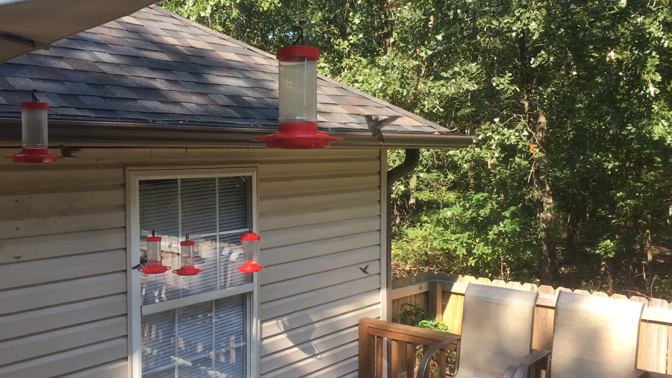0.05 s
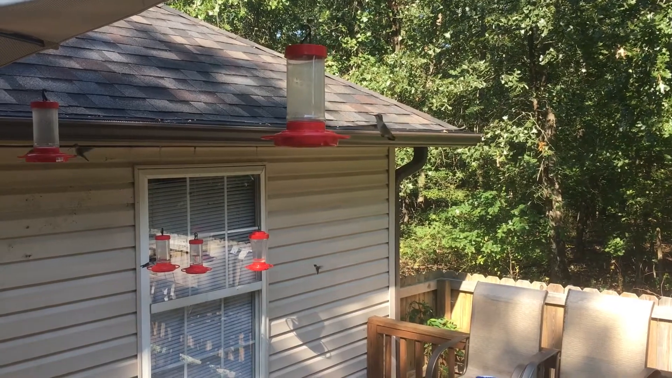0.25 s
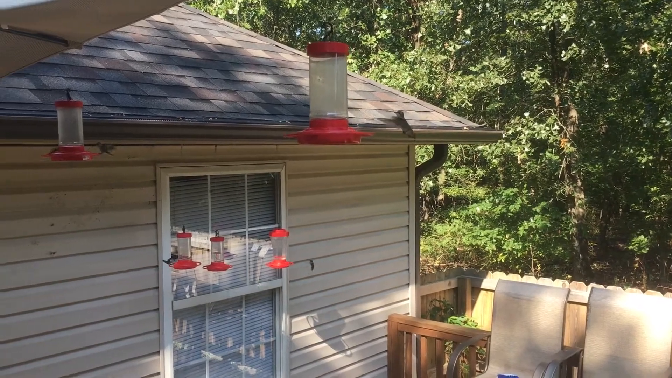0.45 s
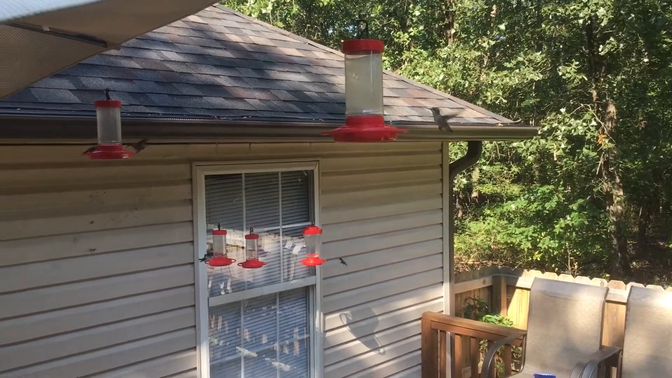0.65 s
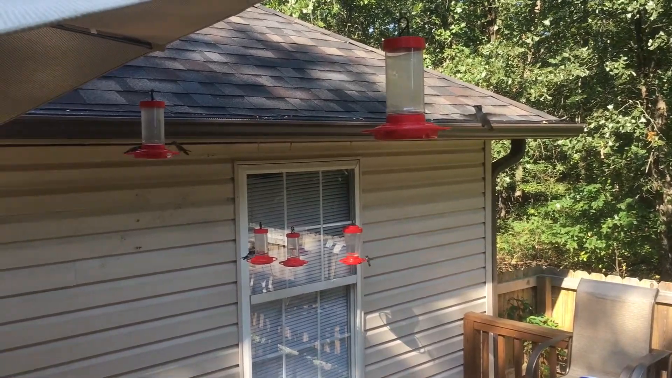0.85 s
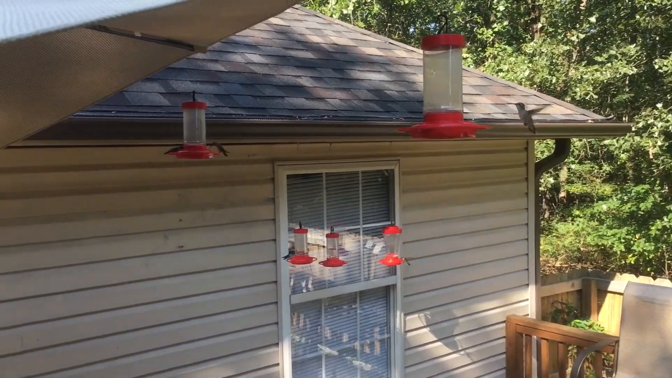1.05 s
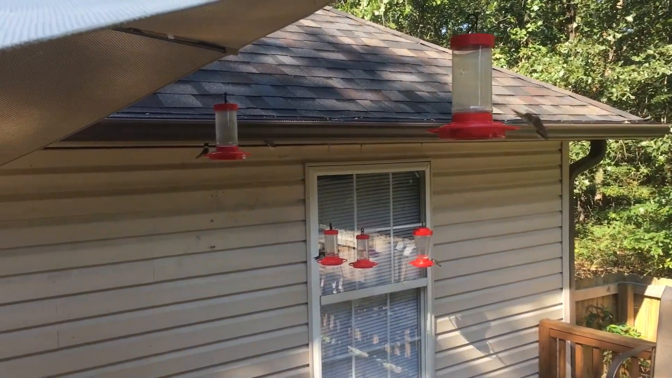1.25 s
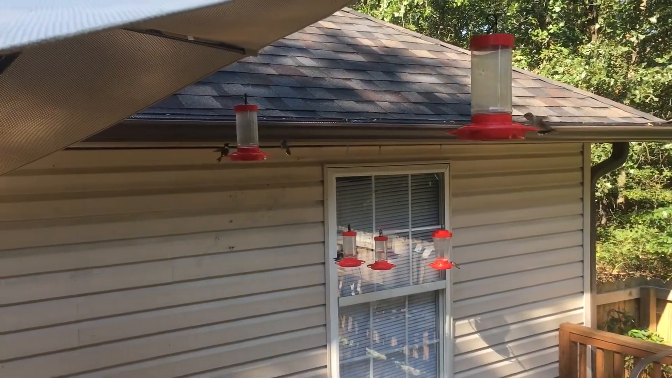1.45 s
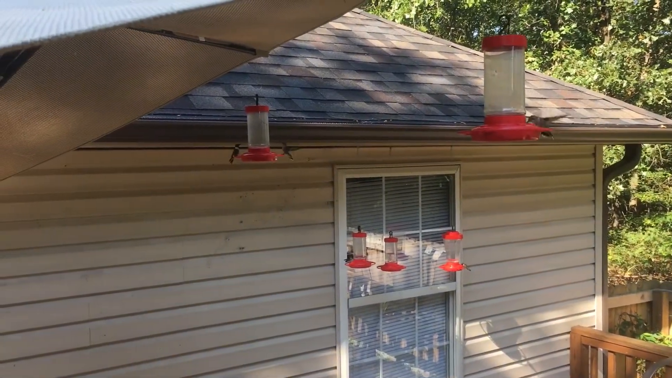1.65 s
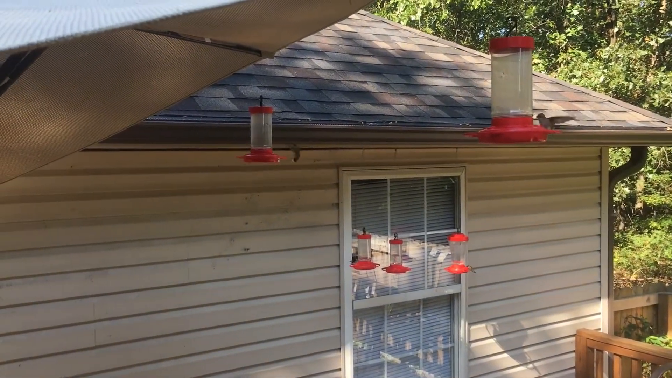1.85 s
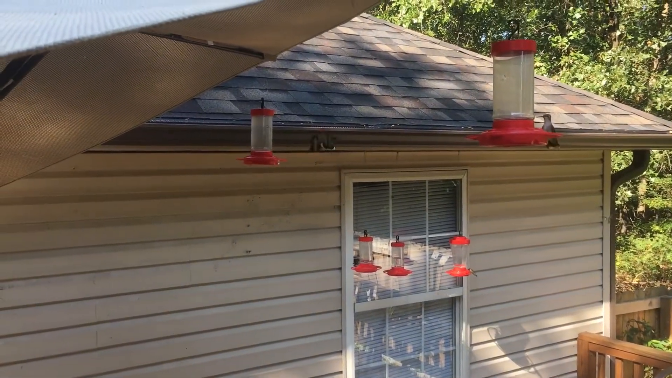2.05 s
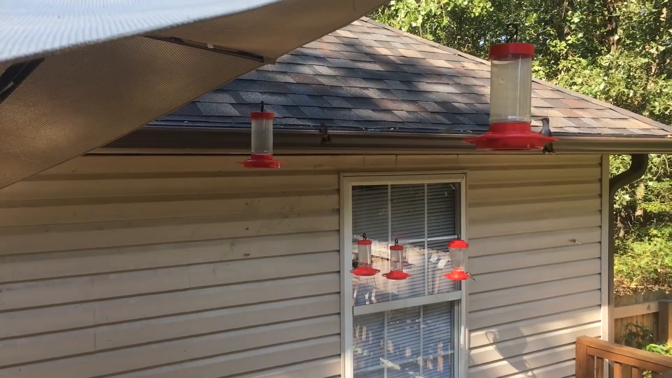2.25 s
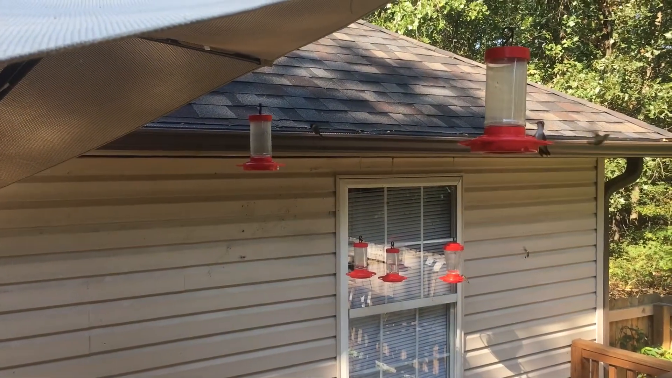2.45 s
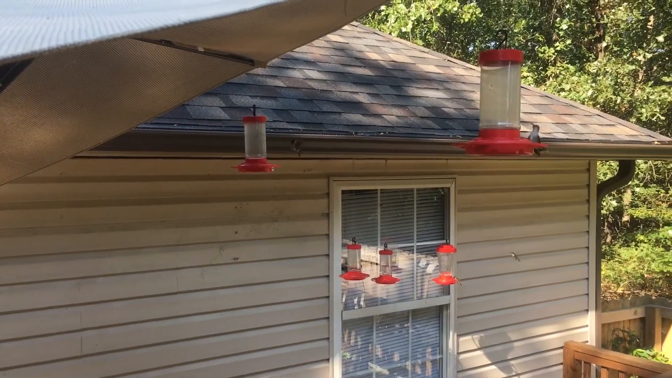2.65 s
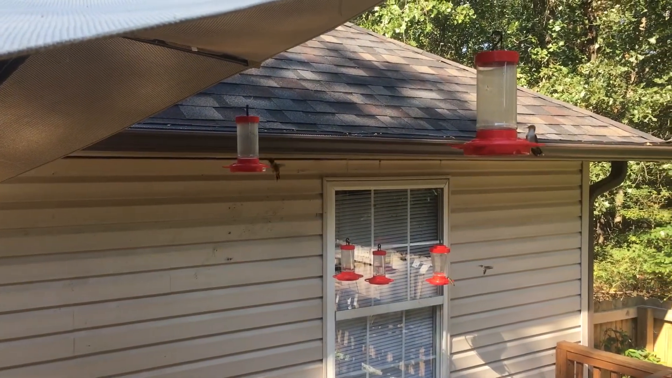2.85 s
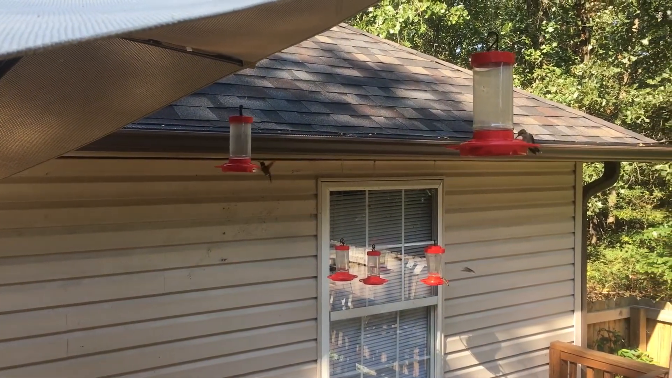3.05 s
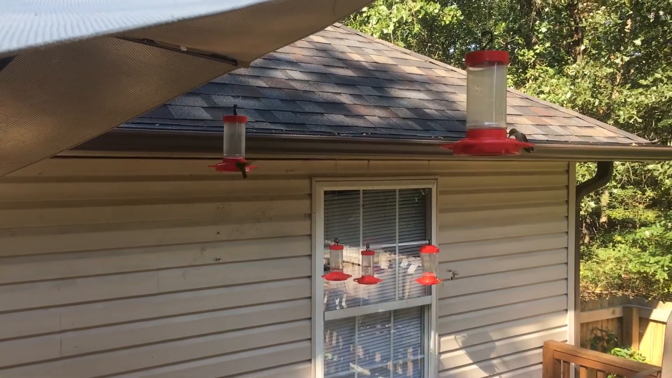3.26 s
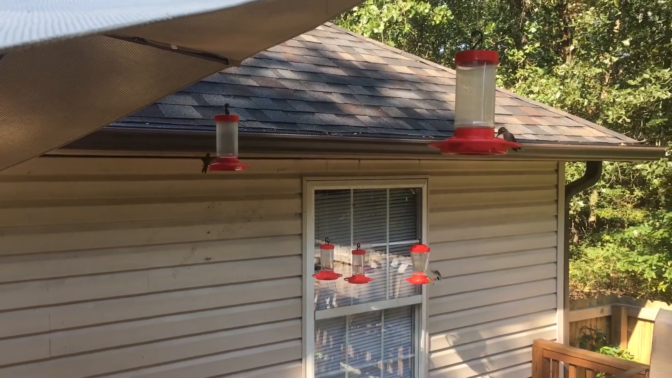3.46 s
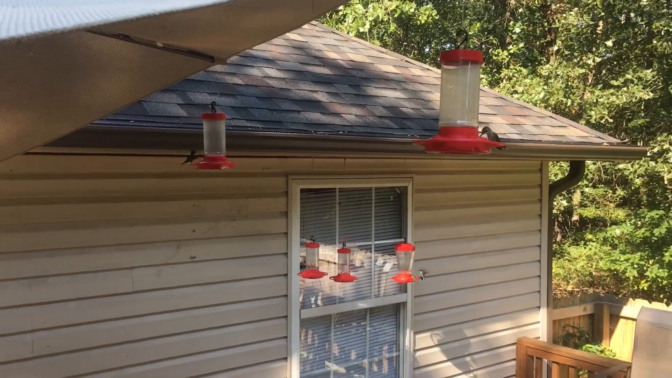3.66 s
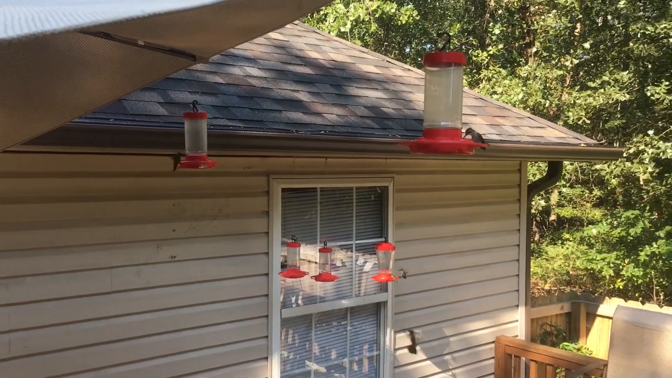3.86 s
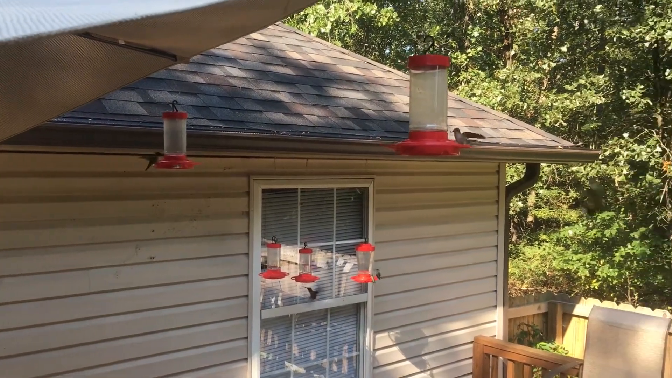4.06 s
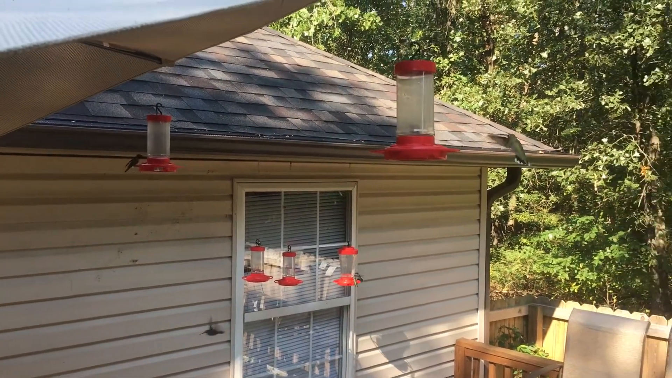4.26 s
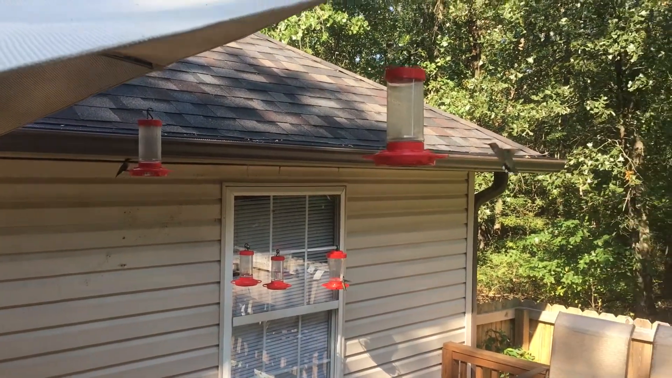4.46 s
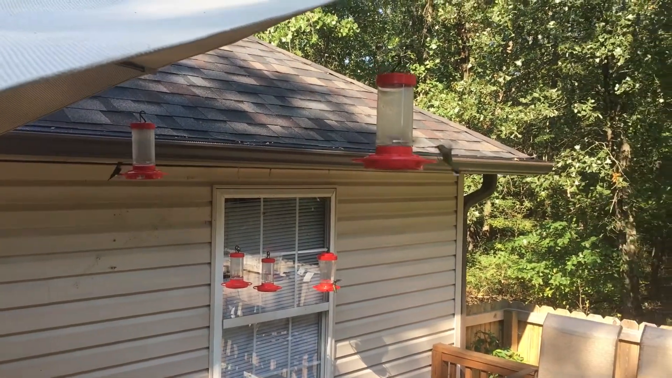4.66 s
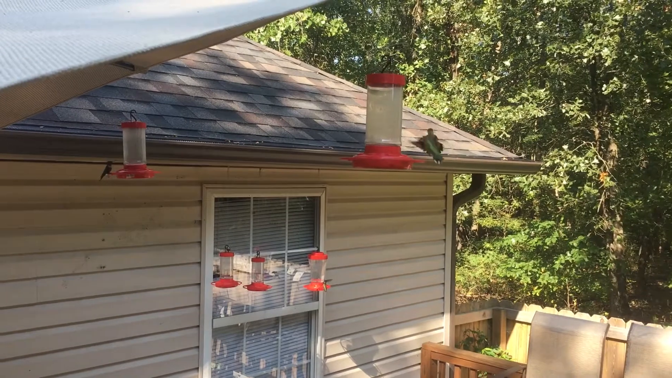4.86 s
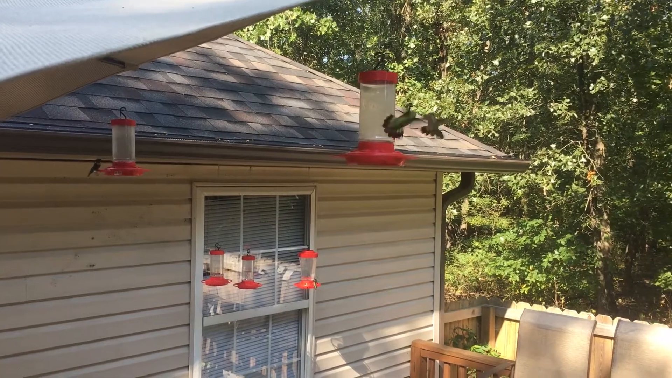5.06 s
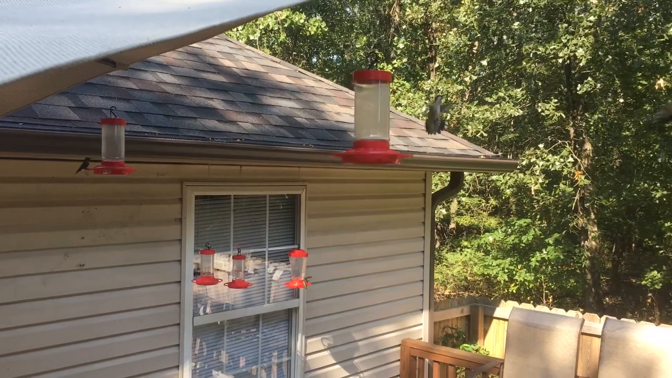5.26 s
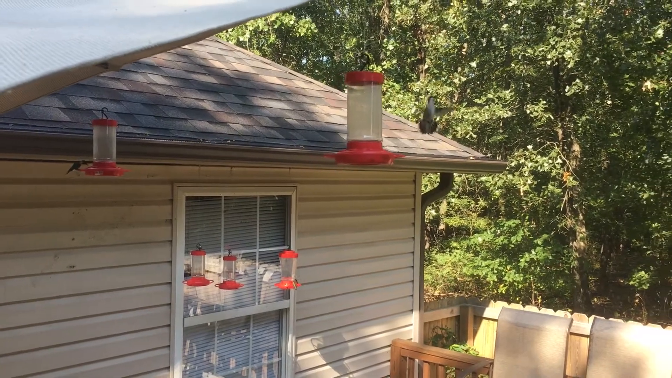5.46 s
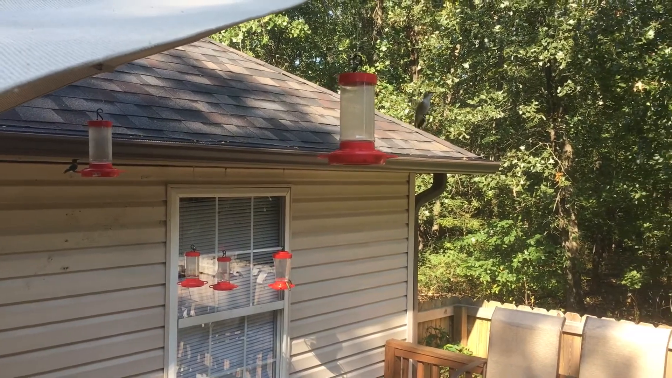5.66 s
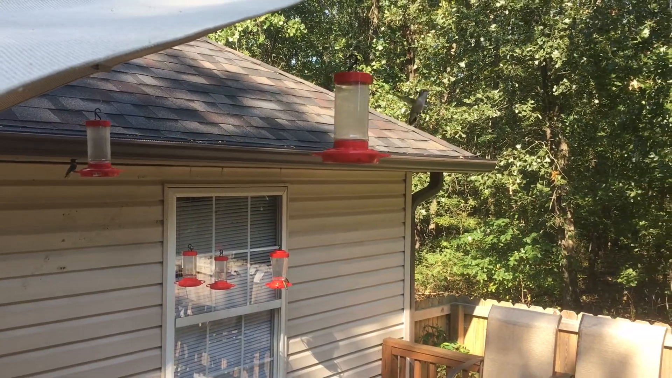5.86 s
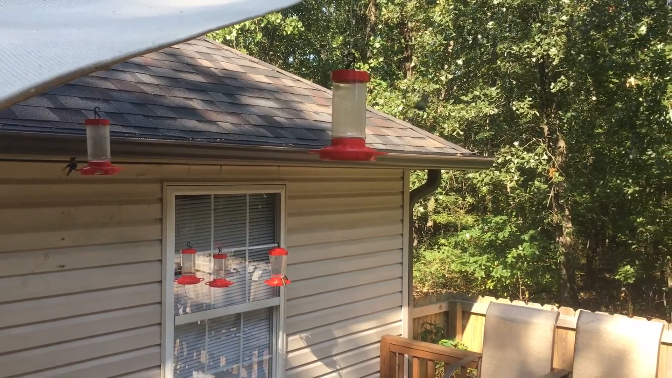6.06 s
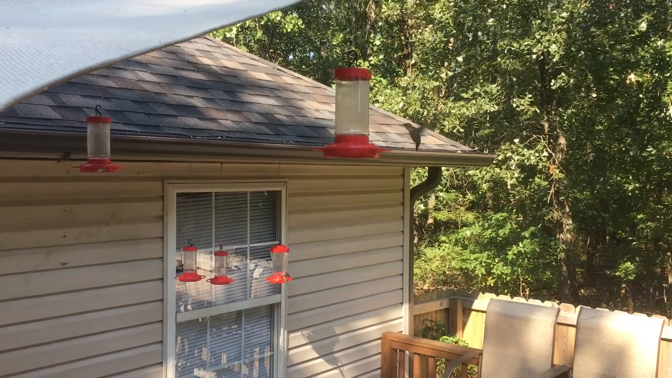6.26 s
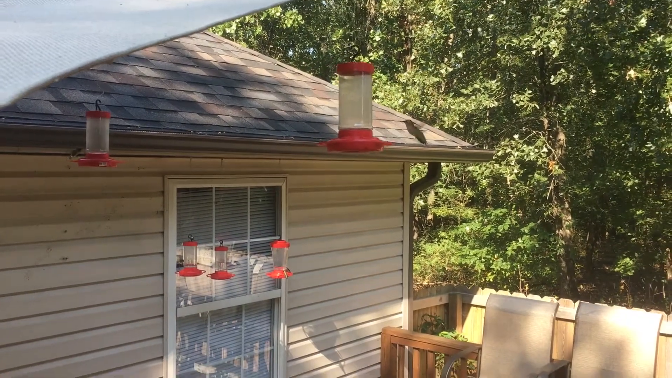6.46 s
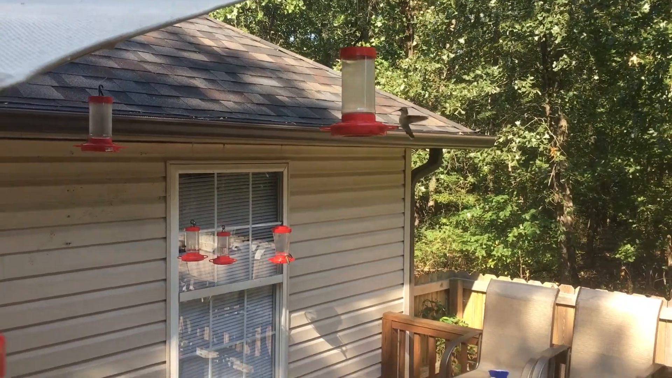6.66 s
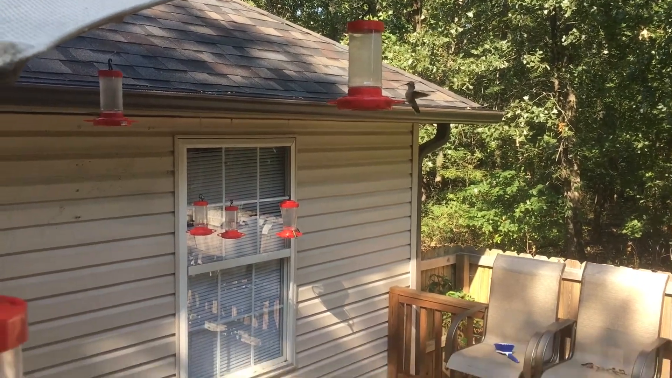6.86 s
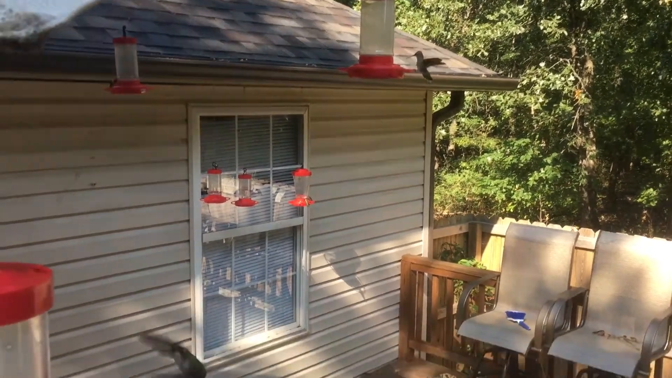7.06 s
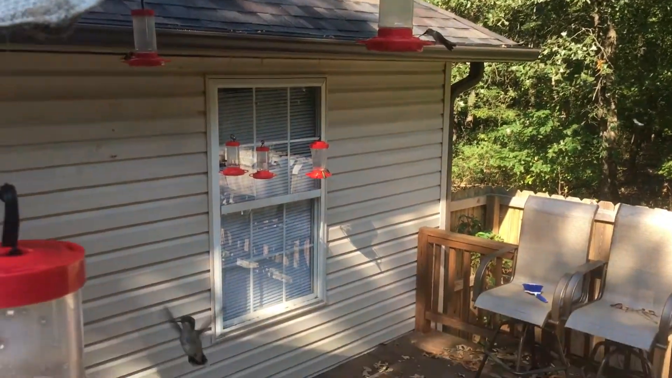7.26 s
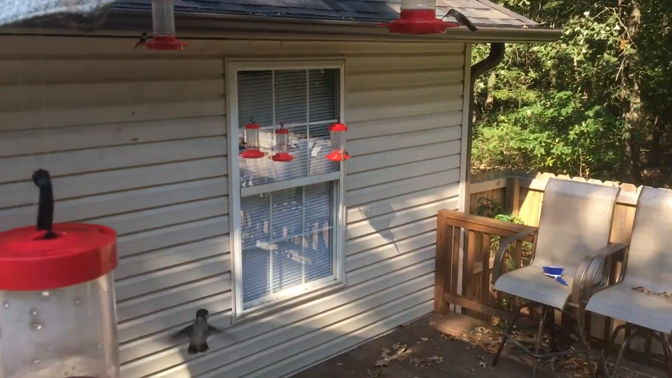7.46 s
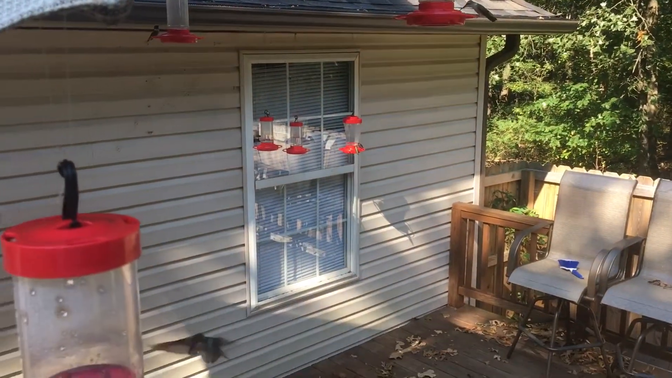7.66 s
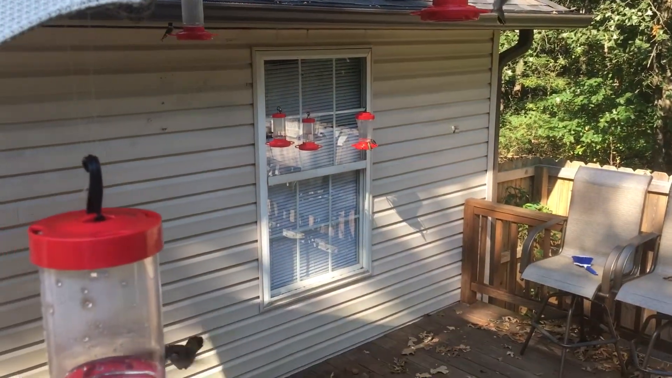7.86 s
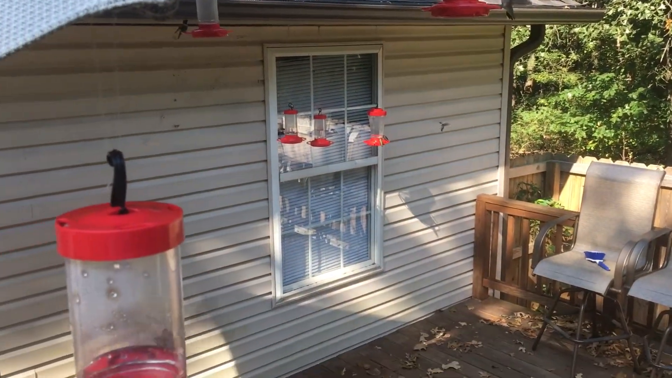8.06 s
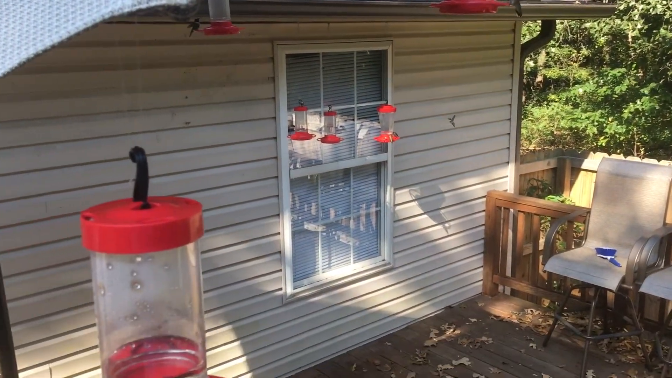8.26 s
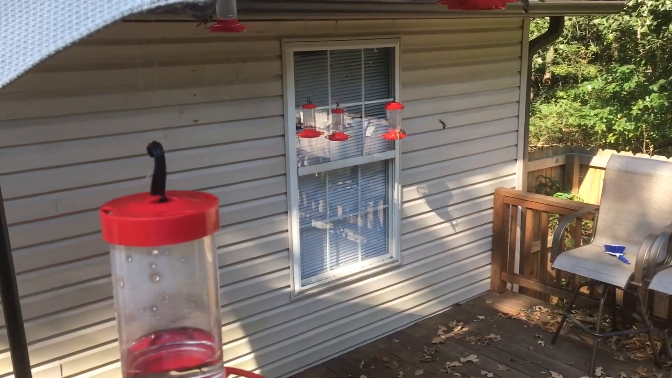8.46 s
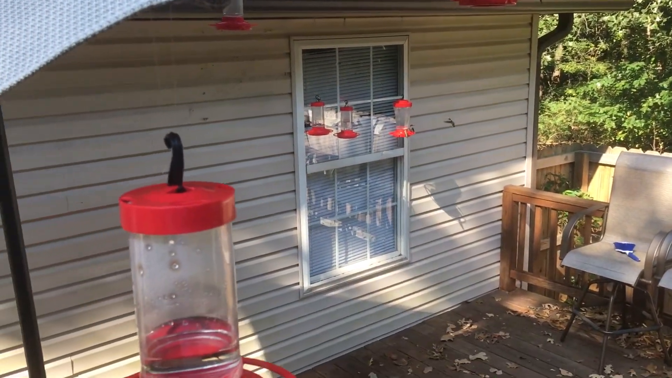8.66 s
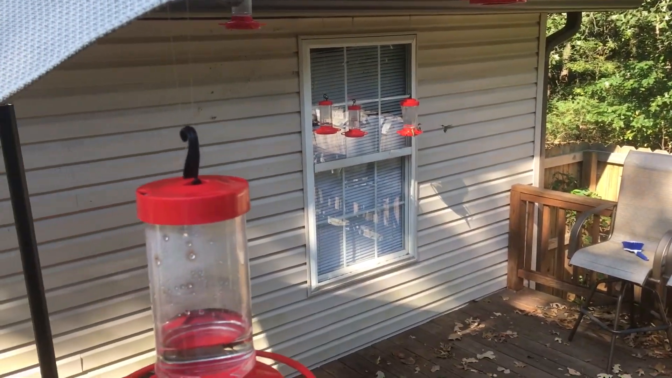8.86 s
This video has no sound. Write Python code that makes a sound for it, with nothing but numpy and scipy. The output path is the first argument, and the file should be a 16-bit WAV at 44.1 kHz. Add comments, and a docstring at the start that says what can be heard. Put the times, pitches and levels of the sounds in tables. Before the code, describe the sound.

A handheld microphone near feeders catches small birds at mixed distances. High squeals and dry rasps open over pulsing insect hiss and low outdoor rumble. Just past the middle, a loud piercing squeal leads into close buzzy chips. A deep wing flutter then brushes by and another bird hovers, before softer chip runs and squeals end the scene. A faint engine hum sinks and fades; reflections off the siding are short.

```python
"""Yard beside a house wall, with feeders: hummingbirds squabble, some close, most farther off.
Chips, rasps, buzzes and squeaks are gliding harmonic stacks through bill resonances; squeals are wavering two-partial tones.
Wings whirr past as summed wingbeat harmonics with swish and feather noise, once very near; one bird hovers.
Insects shrill in the trees as pulsed narrow-band noise over a far chorus, a rumble and a faint animal cry.
A far engine, likely a small plane, drones away, sinking and fading."""
import sys
import numpy as np
from scipy import signal
from scipy.fft import rfft, irfft
from scipy.io import wavfile
from scipy.ndimage import uniform_filter1d

SR = 44100
rng = np.random.default_rng(int(sys.argv[2]) if len(sys.argv) > 2 else 0)


def log_audio(samples):
    """Write samples as a 16-bit WAV file to the path given in sys.argv[1]."""
    # one column per channel
    frames = np.atleast_2d(samples).T
    # limit to full scale, then quantise
    limited = np.clip(frames, -1, 1)
    pcm = np.round(limited * 32767).astype(np.int16)
    wavfile.write(sys.argv[1], SR, pcm)


N = 392490

# resonances of throat and open bill: freq_hz, gain_db
BILL_RESONANCES = [(1400, 2), (2200, -1), (3200, -4.5), (4300, -3.5), (6200, 1), (8200, 4), (10200, -4),
                   (12500, -6.5), (15500, -16)]
CUTOFF_HZ = 15800


def from_db(db):
    """Amplitude ratio of a level in dB."""
    return 10 ** (np.asarray(db) / 20)


def rms_one(x):
    """Scale to rms 1."""
    return x / np.sqrt(np.mean(x ** 2) + 1e-20)


def at_hz(points, hz):
    """Gain of a spectrum, interpolated in dB over log frequency."""
    point_hz, point_db = np.transpose(points)
    return from_db(np.interp(np.log(hz), np.log(point_hz), point_db))


def add(out, start_s, sound):
    """Mix a sound in, cut at the end of the scene."""
    i = max(round(start_s * SR), 0)
    out[i:i + len(sound)] += sound[:max(N - i, 0)]


def drift(rate_hz):
    """Slow random curve, rms 1: noise through a double pole, run at SR / 40."""
    pole = np.exp(-80 * np.pi * rate_hz / SR)
    white = rng.standard_normal(N // 40 + 2002)
    slow = signal.lfilter([1], [1, -2 * pole, pole * pole], white)[2000:]   # drop the settling
    return np.interp(np.arange(N) / 40, np.arange(len(slow)), rms_one(slow))


def noise(spectrum):
    """Noise of a given spectrum, rolled off below its first point, rms 1."""
    hz = np.maximum(np.arange(N // 2 + 1) * SR / N, 1)
    low_cut = hz ** 2 / (hz ** 2 + spectrum[0][0] ** 2)
    white = rfft(rng.standard_normal(N))
    return rms_one(irfft(white * at_hz(spectrum, hz) * low_cut, N))


def narrow_noise(hz, width_hz):
    """Noise in one resonance, rms 1."""
    sos = signal.butter(2, [hz - width_hz / 2, hz + width_hz / 2], "band", fs=SR, output="sos")
    return rms_one(signal.sosfilt(sos, rng.standard_normal(N)))


def turns(hz):
    """Phase in radians of a moving pitch."""
    return 2 * np.pi * np.cumsum(hz) / SR


def wobble(n, count):
    """Random bends across one call: count points joined by lines."""
    return np.interp(np.linspace(0, count - 1, n), np.arange(count), rng.standard_normal(count))


def swell(u, attack, fullness):
    """Loudness arch over one note; attack below 1 moves its peak early."""
    return np.abs(np.sin(np.pi * u ** attack)) ** fullness


def sweep(length_s, start_hz, end_hz, trill, dull=0, trill_hz=205, bend=1.35, jitter=0.017,
          attack=0.6, fullness=0.83, order=9):
    """One syrinx note: a harmonic stack glides through the bill's resonances; a fast trill makes it a buzz."""
    u = np.linspace(0, 1, max(round(length_s * SR), 8))
    glide_hz = start_hz + (end_hz - start_hz) * u ** bend
    trill_curve = trill * np.cos(2 * np.pi * trill_hz * length_s * u)
    pitch_hz = glide_hz * np.exp(trill_curve + jitter * wobble(len(u), count=14))
    k = np.arange(1, order + 1)[:, None]
    gain = at_hz(BILL_RESONANCES, k * pitch_hz) * (k * pitch_hz < CUTOFF_HZ) / k ** dull
    stack = gain * np.cos(k * turns(pitch_hz))
    return rms_one(stack.sum(0)) * swell(u, attack, fullness)


def distance_of(db, near_db=-36, near_m=1.18, db_per_doubling=8):
    """All birds call about equally hard, so a call's level tells its distance in m."""
    return near_m * 2 ** ((near_db - db) / db_per_doubling)


def yard_echo(x, t60_s=0.34, build_s=0.00075, early_db=5, early_s=0.0076):
    """A quick cluster of reflections off siding and deck, then a short, diffuse tail from the trees."""
    t = np.arange(SR // 2) / SR
    decay = from_db(-60 * t / t60_s) + from_db(early_db) * np.exp(-t / early_s)
    tail = rng.standard_normal(len(t)) * decay * (1 - np.exp(-t / build_s))
    low_pass = signal.butter(1, 11000, fs=SR, output="sos")
    tail = signal.sosfilt(low_pass, tail / np.linalg.norm(tail))
    return signal.fftconvolve(x, tail)[:N]


def in_yard(notes, echo_distance_m=4.2):
    """Place notes (start_s, sound, distance_m): near ones sound dry, far ones mostly by their echo."""
    direct, sent = np.zeros((2, N))
    for start_s, sound, distance_m in notes:
        wet = distance_m / echo_distance_m   # 1: echo as loud as direct sound
        add(direct, start_s, sound / np.hypot(1, wet))
        add(sent, start_s, sound * wet / np.hypot(1, wet))
    return direct + yard_echo(sent)


def background(air_level_db=-55.5, flicker_db=1.07):
    """Low outdoor rumble under the hiss of many far insects; a low and a high choir fade at their own pace."""
    # steady outdoor air: freq_hz, density_db_per_hz (relative)
    air_spectrum = [(25, -25), (48, 4.5), (100, -1), (200, -5), (350, -13), (600, -23), (1200, -30.5),
                    (2000, -28.5), (10400, -37.5), (11500, -34.5), (15500, -37)]
    # blended far insects: freq_hz, density_db_per_hz (relative)
    chorus_spectrum = [(1600, -20), (2250, 0), (3250, 0), (3800, -9), (5300, -10), (6100, 0), (6600, -5),
                       (7600, -2), (9000, -5), (9550, -8), (10100, -28)]
    # choirs: low_hz, high_hz, level_db (at 0 s, before band-pass), fade_db_per_s
    choir_bands = [(1020, 4130, -58.5, 0.61), (4570, 15200, -61, 0.14)]
    t = np.arange(N) / SR
    out = from_db(air_level_db) * noise(air_spectrum)
    for low_hz, high_hz, db, fade_db_per_s in choir_bands:
        band = signal.butter(4, [low_hz, high_hz], "band", fs=SR, output="sos")
        choir = signal.sosfilt(band, noise(chorus_spectrum))
        out = out + from_db(db - fade_db_per_s * t + flicker_db * drift(9.0)) * choir
    return out


def engine(start_hz=170.15, sag_hz_per_s=1.36, level_db=-50, recedes_s=4, fade_db_per_s=3,
           waver_db=1.24, waver_hz=0.27, octave_db=-18.5, octave_waver_db=2.5):
    """A drone with a weak octave that sinks in pitch and fades as it recedes."""
    t = np.arange(N) / SR
    db = level_db - fade_db_per_s * np.maximum(t - recedes_s, 0)
    phase = turns(start_hz - sag_hz_per_s * t + waver_hz * drift(1.7))
    octave = from_db(octave_db + octave_waver_db * drift(5.2)) * np.sin(2 * phase)
    return np.sqrt(2) * from_db(db + waver_db * drift(4.3)) * (np.sin(phase) + octave)


def far_call(distance_m=7):
    """A faint, falling animal cry from the woods, in two parts: wavering sines."""
    # start_s, length_s, start_hz, end_hz, level_db (peak)
    cries = [(6.56, .1, 1025, 995, -69.5), (6.68, .24, 985, 880, -70)]
    notes = []
    for start_s, length_s, start_hz, end_hz, db in cries:
        u = np.linspace(0, 1, round(length_s * SR))
        glide_hz = start_hz + (end_hz - start_hz) * u ** 2
        phase = turns(glide_hz * (1 + 0.0035 * wobble(len(u), count=10)))
        cry = from_db(db) * np.sin(phase) * swell(u, attack=0.46, fullness=0.52)
        notes.append((start_s, cry, distance_m))
    return in_yard(notes)


def insects(depth=0.22, lisp_per_s=3.9, lisp_db=-67, answer_db=-70):
    """Wing files scraped in fast pulses on narrow resonances; two more lisp by turns in slow, higher bursts."""
    # trills: start_s, stop_s, freq_hz, width_hz, pulses_per_s, level_db (before pulsing)
    trills = [(0, 1.25, 8570, 60, 29, -67), (2.33, 4.4, 8490, 60, 29, -68), (4.4, 7.02, 8550, 60, 29, -69),
              (0, 8.9, 7750, 60, 27, -70.5), (1.2, 8.9, 8200, 60, 28, -74)]
    t, out = np.arange(N) / SR, 0
    for start_s, stop_s, hz, width_hz, per_s, db in trills:
        singing = uniform_filter1d(1. * ((t >= start_s) & (t < stop_s)), size=1500)   # soft edges
        pulses = 1 + depth * np.sin(turns(per_s * (1 + 0.024 * drift(1.4))))
        out = out + from_db(db) * singing * pulses * narrow_noise(hz, width_hz)
    turn = turns(lisp_per_s * (1 + 0.23 * drift(1.84))) / 2   # half phase: one burst each per cycle
    lisp = from_db(lisp_db) * np.sin(turn) ** 4 * narrow_noise(9320, width_hz=590)
    answer = from_db(answer_db) * np.cos(turn) ** 4 * narrow_noise(8670, width_hz=250)
    return out + lisp + answer


def far_twitter(distance_m=10, count=26):
    """Other birds keep up faint chips at random around the yard; louder ones are trilled more."""
    notes = []
    for when, loud, high in rng.random((count, 3)):
        chip = sweep(.022, 2400 + 2000 * high, 1780, trill=0.11 * loud)
        notes.append((when * N / SR, from_db(-62 + 8 * loud) * chip, distance_m))
    return in_yard(notes)


def hover(from_s=6.2, until_s=8.06, fade_db_per_s=34, beats_per_s=43, level_db=-58,
          unsteady=0.04, flutter_db=3):
    """Close hovering: both strokes of a beat push air, so the hum is strongest at twice the beat rate."""
    t = np.arange(N) / SR
    db = level_db - fade_db_per_s * np.abs(t - np.clip(t, from_s, until_s))
    phase = turns(beats_per_s * (1 + unsteady * drift(6.41)))
    harmonics_db = [-6, 0, -13, -9]
    hum = sum(from_db(level) * np.sin(k * phase) for k, level in enumerate(harmonics_db, 1))
    return from_db(db + flutter_db * drift(6)) * rms_one(hum)


def wings(beats_per_s=49, leaving_ratio=1.55, doppler=.04, swish_db=-7, feather_db=-19.5,
          feather_hz=2800, unsteady=0.02, wake=.3, order=12):
    """Beats are sharp pressure dips, then feather rustle; level falls with distance, pitch sinks, wake blurs."""
    # passes by the listener: closest_s, approach_s, level_db (closest, before layer mix)
    passes = [(2.1, .17, -59.5), (2.98, .12, -57.5), (4.149, 0.054, -51.5), (5.171, .1, -61),
              (6.188, .043, -42.5), (7.01, 0.058, -51.5), (7.82, 0.12, -58.5)]
    # pressure pulse of one wingbeat: freq_hz, level_db (relative)
    wing_spectrum = [(45, -10), (98, -1), (150, -6), (200, -1.5), (290, -8.5), (400, -9.5), (600, -18.5),
                     (1200, -24)]
    t = np.arange(N) / SR
    power, leaving = 0, 0
    for closest_s, approach_s, db in passes:
        away = (t - closest_s) / np.where(t < closest_s, approach_s, approach_s * leaving_ratio)
        near_power = (from_db(db) / (1 + away ** 2)) ** 2
        power = power + near_power
        leaving = leaving + near_power * np.tanh(away)
    leaving = leaving / power   # power-weighted: -1 coming, 1 going
    beat_hz = beats_per_s * (1 - doppler * leaving) * (1 + unsteady * drift(11.44))
    phase = turns(beat_hz)
    blur = wake * np.maximum(leaving, 0)
    beats = rms_one(sum(-at_hz(wing_spectrum, k * beat_hz.mean()) * np.cos(k * phase + np.pi / 4)
                        for k in range(1, order + 1)))
    hum = np.sqrt(2) * np.sin(2 * phase)   # the weaker return stroke fills in the second harmonic
    low_pass = signal.butter(2, 1500, fs=SR, output="sos")
    swish = signal.sosfilt(low_pass, noise(wing_spectrum)) * (1 + 0.27 * np.cos(phase))
    feathers = narrow_noise(feather_hz, width_hz=4400) * rms_one(np.exp(2 * np.cos(phase - 1)))
    tones = 0.87 * (1 - blur) * beats + 0.33 * hum
    rustle = (from_db(swish_db) + blur) * swish + from_db(feather_db) * feathers
    return np.sqrt(power) * (tones + rustle)


def rasps(fall=.8, distance_m=9):
    """Long, unevenly trilled notes from across the yard, blurred by their echo."""
    # start_s, length_s, start_hz, level_db (before swell)
    rasp_notes = [(0.173, 0.099, 6580, -57), (0.369, 0.033, 7300, -52.5), (1.121, 0.081, 7400, -55),
                  (3.054, 0.05, 6400, -56), (3.167, 0.076, 5920, -57), (3.683, .045, 5550, -59),
                  (6.276, 0.039, 7485, -51.5), (6.865, .044, 6920, -55.5), (7.454, 0.062, 7470, -52.5),
                  (8.101, 0.1, 7330, -53.5), (8.707, 0.056, 6100, -54.5)]
    notes = []
    for start_s, length_s, start_hz, db in rasp_notes:
        rasp = sweep(length_s, start_hz, start_hz * fall, trill=0.196, jitter=0.0683,
                     attack=0.36, fullness=0.25)
        notes.append((start_s, from_db(db) * rasp, distance_m))
    return in_yard(notes)


def squeals(rest_hz=6530, pull=.33, waver=0.0063, rough_per_m=0.0016, flutter_db=1.1,
            octave_db=6, octave_loss_db_per_m=1.7, farther=1.1):
    """Wavering whistles whose octave passes the bill's resonances; far ones are coarser and duller."""
    # start_s, length_s, start_hz, level_db (before swell)
    squeal_notes = [(0.065, 0.059, 6890, -48.5), (.822, 0.084, 6170, -57.5), (0.991, 0.073, 7040, -48.5),
                    (2.931, .085, 6080, -54), (2.988, .037, 7000, -55), (3.02, .06, 6250, -55),
                    (4.505, 0.04, 7400, -57), (4.607, .016, 7250, -52), (4.617, 0.067, 6620, -36.5),
                    (7.364, 0.069, 7920, -55), (7.391, 0.026, 6790, -50), (8.1, 0.067, 7420, -52),
                    (8.426, 0.091, 5630, -47.5), (8.582, 0.11, 6260, -56), (8.812, 0.063, 7040, -50.5)]
    notes = []
    for start_s, length_s, start_hz, db in squeal_notes:
        u = np.linspace(0, 1, max(round(length_s * SR), 8))
        distance_m = farther * distance_of(db)
        pitch_hz = start_hz + (rest_hz - start_hz) * pull * u   # low ones rise, high ones sag
        rough = rough_per_m * distance_m * wobble(len(u), count=len(u) // 100)
        phase = turns(pitch_hz * (1 + waver * wobble(len(u), count=16) + rough))
        bill_gain = at_hz(BILL_RESONANCES, 2 * pitch_hz) / at_hz(BILL_RESONANCES, pitch_hz)
        octave = from_db(octave_db - octave_loss_db_per_m * distance_m) * bill_gain
        flutter = from_db(db + flutter_db * wobble(len(u), count=8))
        loudness = swell(u, attack=0.68, fullness=0.42) * flutter
        tone = np.sin(phase) + octave * np.sin(2 * phase)
        notes.append((start_s, np.sqrt(2) * loudness * tone, distance_m))
    return in_yard(notes)


def squeaks(length_s=0.0086, end_hz=6670, dull=-0.43):
    """Very short, clean notes that flick upward in a squabble; negative dull lifts the harmonics."""
    # start_s, start_hz, level_db (before swell)
    squeak_notes = [(4.718, 5970, -43), (4.731, 5440, -45), (5.249, 6100, -34.5), (5.26, 5280, -32.5)]
    notes = []
    for start_s, start_hz, db in squeak_notes:
        squeak = sweep(length_s, start_hz, end_hz, trill=0, dull=dull)
        notes.append((start_s, from_db(db) * squeak, distance_of(db)))
    return in_yard(notes)


def buzzes(fall=.48, trill=0.215, dull_per_m=0.032):
    """Chips with a fast trill that fall about an octave, duller with distance."""
    # start_s, length_s, start_hz, level_db (before swell)
    buzz_notes = [(.582, 0.024, 3870, -55), (4.671, 0.01, 6520, -50), (4.816, .031, 4060, -42),
                  (5.161, 0.042, 4600, -34.5), (5.269, .014, 4410, -34.5), (7.586, 0.052, 3970, -50),
                  (8.257, 0.028, 3930, -52.5), (8.635, 0.023, 4200, -51.5), (8.812, 0.04, 4200, -51.5)]
    notes = []
    for start_s, length_s, start_hz, db in buzz_notes:
        distance_m = distance_of(db)
        buzz = sweep(length_s, start_hz, start_hz * fall, trill, dull_per_m * distance_m,
                     bend=1.15, attack=0.74, fullness=0.82)
        notes.append((start_s, from_db(db) * buzz, distance_m))
    return in_yard(notes)


def chips(typical_start_hz=3410, typical_end_hz=1523, typical_length_s=.0222,
          end_power=0.21, length_power=0.704, first_gap_s=.059, slowing_s=0.0039,
          db_per_octave=11, dull_per_m=0.046, soft_dull=0.6,
          uneven_db=1.0, uneven_pitch=0.0148, trill_per_m=0.011):
    """Short falling sweeps, in runs that slow down; far chips and soft, low ones have weaker harmonics."""
    # start_s, chip_count, start_hz (mean), level_db (mean, before swell)
    chip_runs = [(0.616, 1, 2300, -51), (2.034, 1, 2100, -56), (2.346, 1, 2080, -51), (2.849, 1, 1990, -51),
                 (4.741, 1, 2300, -52), (4.890, 2, 3370, -38), (5.010, 1, 3320, -41.5),
                 (5.076, 1, 3310, -38), (5.344, 1, 3420, -36.5), (5.408, 1, 3400, -36),
                 (5.485, 1, 2910, -45), (5.915, 1, 2420, -47.5), (7.695, 5, 3800, -52),
                 (7.818, 1, 2050, -55.5), (8.331, 5, 3210, -57.5), (8.394, 1, 2090, -54.5),
                 (8.773, 1, 2050, -56), (8.861, 1, 2030, -54)]
    notes = []
    for start_s, count, start_hz, db in chip_runs:
        height = start_hz / typical_start_hz
        # low chips are uttered more softly, so they are nearer than their level tells
        distance_m = distance_of(db - db_per_octave * np.log2(height))
        length_s = typical_length_s * height ** length_power
        end_hz = typical_end_hz * height ** end_power
        dull = dull_per_m * distance_m - soft_dull * np.log2(height)
        for k in range(round(count)):
            chip_hz = start_hz * (1 + uneven_pitch * rng.standard_normal())
            chip = sweep(length_s, chip_hz, end_hz, trill_per_m * distance_m, dull,
                         attack=0.81, fullness=1.02)
            gain = from_db(db + uneven_db * rng.standard_normal())
            notes.append((start_s, gain * chip, distance_m))
            start_s = start_s + first_gap_s + k * slowing_s
    return in_yard(notes)


def scene():
    """Sum of all sources, one channel."""
    surroundings = background() + engine() + far_call() + insects()
    flight = hover() + wings()
    calls = far_twitter() + rasps() + squeals() + squeaks() + buzzes() + chips()
    return (surroundings + flight + calls)[None]


def record(dry):
    """Steep elliptic low-pass at CUTOFF_HZ."""
    return signal.sosfilt(signal.ellip(12, .1, 80, CUTOFF_HZ, fs=SR, output="sos"), dry)


dry = scene()
out = record(dry)
log_audio(out)
```